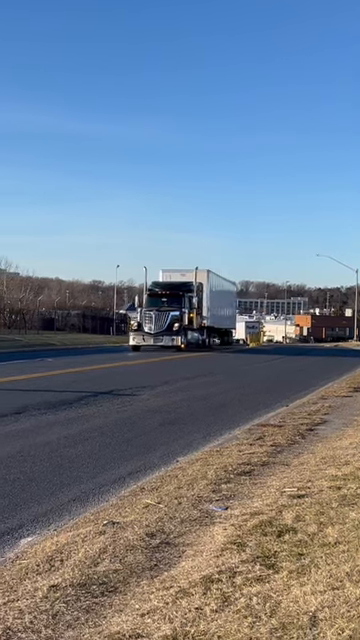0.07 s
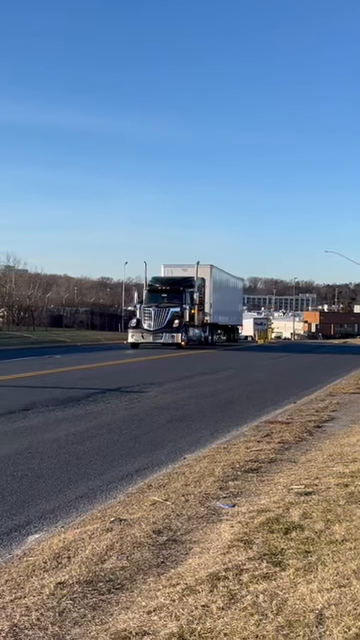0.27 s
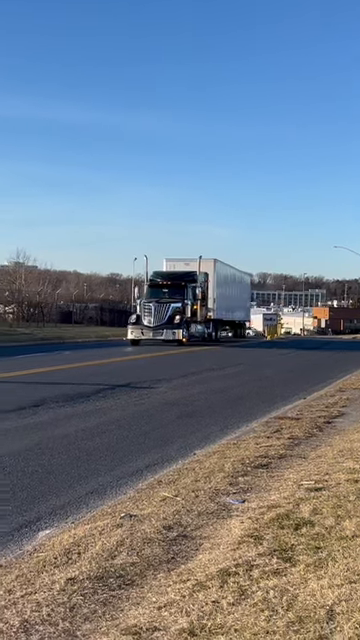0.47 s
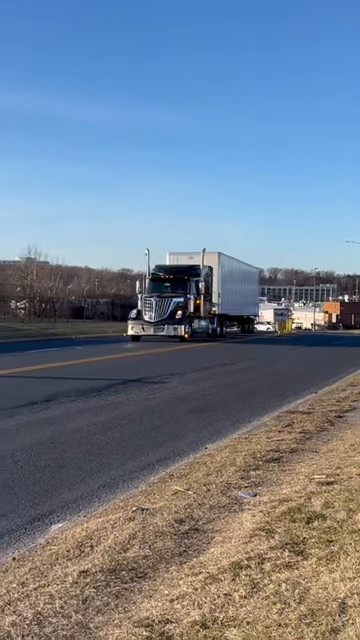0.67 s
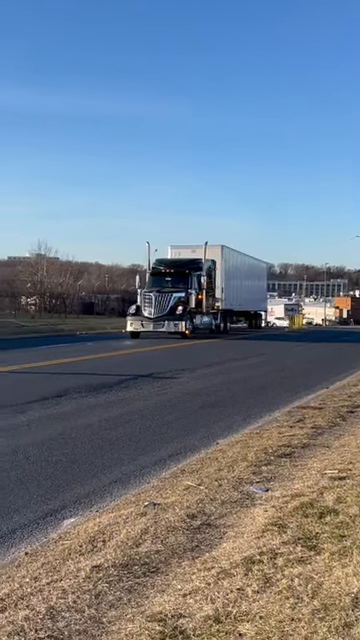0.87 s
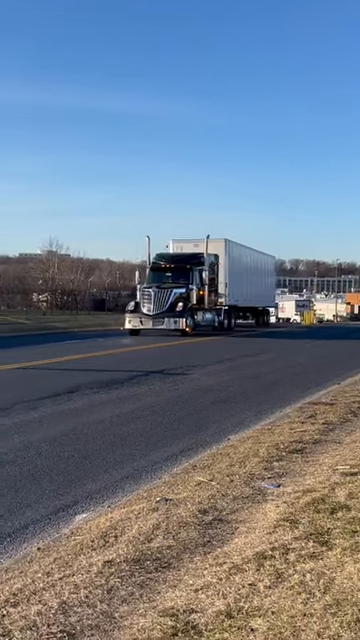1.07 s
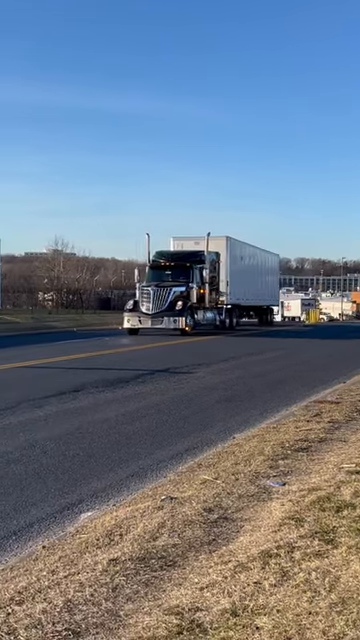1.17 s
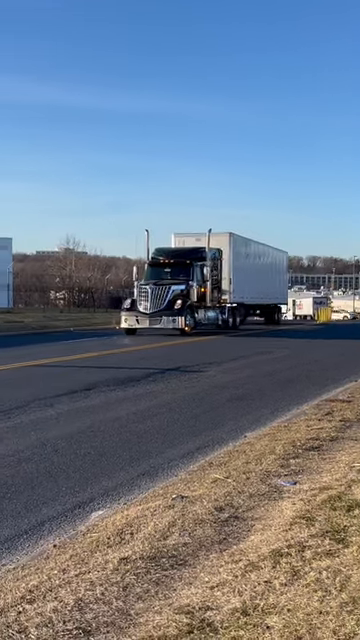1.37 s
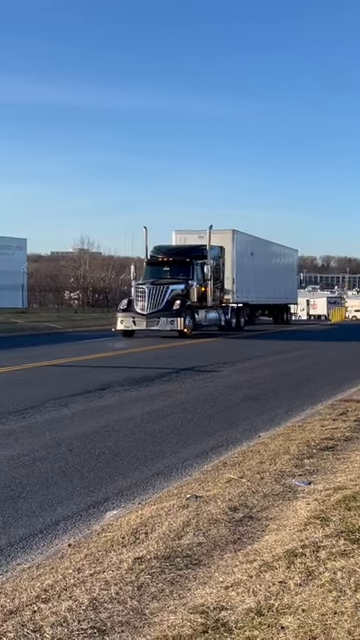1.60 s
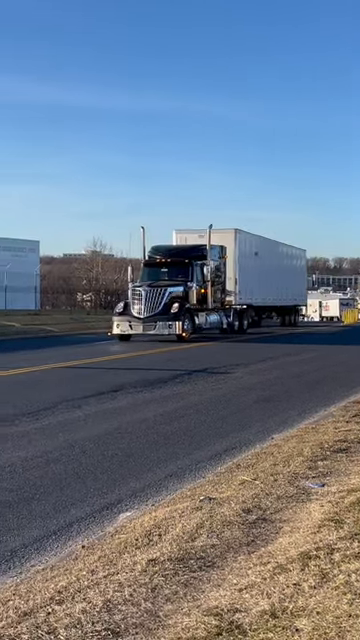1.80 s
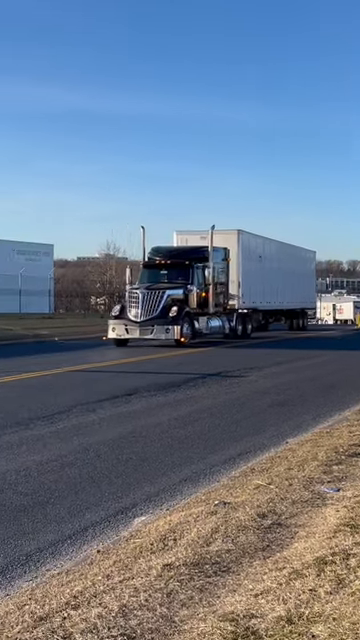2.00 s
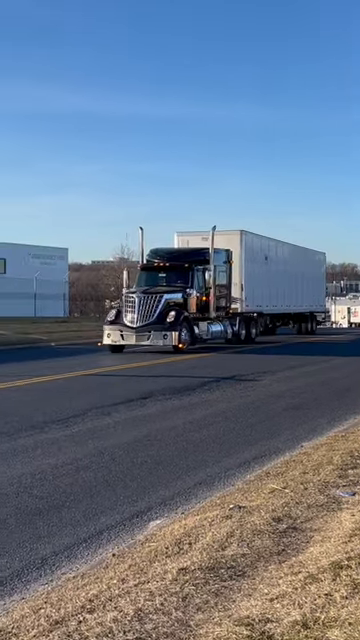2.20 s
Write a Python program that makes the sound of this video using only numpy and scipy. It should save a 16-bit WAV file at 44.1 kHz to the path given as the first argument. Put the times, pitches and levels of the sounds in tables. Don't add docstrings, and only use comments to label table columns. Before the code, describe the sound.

A truck air horn sounds three times at an open roadside. From 0 to 0.9 s, gusts buffet and thump the stereo microphone over tyre roar and low exhaust hum. A brassy, buzzing three-note blast runs about 0.95-1.25 s, a longer one 1.3-1.65 s, a short one 1.72-1.95 s, with hiss and wall echoes. Faint air puffs near 2.0 and 2.2 s close over quieter rumble.

```python
import sys
import numpy as np
from scipy import signal
from scipy.fft import rfft, irfft, next_fast_len
from scipy.io import wavfile
from scipy.ndimage import uniform_filter1d, map_coordinates

SR = 44100
rng = np.random.default_rng(int(sys.argv[2]) if len(sys.argv) > 2 else 0)


def output_pcm(signal):
    pcm = np.clip(np.atleast_2d(signal).T, -1, 1) * 32767
    wavfile.write(sys.argv[1], SR, np.round(pcm).astype(np.int16))


def boost_factor(decibels):
    exponent = np.asarray(decibels, float) / 20
    return 10 ** exponent


N = 99225
T = np.arange(N) / SR
HALVES = np.array([[0.5], [-0.5]])


def unit(x):
    return x / np.sqrt(np.mean(x ** 2) + 1e-20)


def along(points, hz, column=1):
    p = np.array(points, float)
    return np.interp(np.log(hz + 1), np.log(p[:, 0] + 1), p[:, column])


def curve(points):
    return np.interp(T, *np.transpose(points))


def wobble(rate, count=1):
    knots = np.arange(N) * min(rate, 150) / SR
    return np.array([map_coordinates(rng.standard_normal(400), [knots]) for _ in range(count)])


def filtered(x, response):
    m = next_fast_len(N + 8192)
    return irfft(rfft(x, m) * response(np.fft.rfftfreq(m, 1 / SR)), m)[..., :N]


def rush(spectrum, alike):
    def mid_side(hz):
        turn = np.arccos(np.clip(along(alike, hz), -1, 1)) / 2
        return boost_factor(along(spectrum, hz)) * [np.cos(turn), np.sin(turn)]

    mid, side = filtered(rng.standard_normal((2, N)), mid_side)
    return unit(np.array([mid + side, mid - side]))


def patchy(x):
    z = signal.stft(x, nperseg=512)[2]
    field = rng.standard_normal(z.shape[-2:])
    field = uniform_filter1d(uniform_filter1d(field, size=4, axis=0), size=8, axis=1)
    patch_db = 3.5 * (unit(field) - 1.5)
    return signal.istft(z * boost_factor(patch_db), nperseg=512)[1][..., :N]


# (time [s], level [dB])
GUSTS = [(0.0, -34.5), (0.09, -36), (0.45, -32), (0.53, -28.5), (0.64, -35), (0.69, -24), (0.74, -35),
         (0.8, -28), (0.9, -37), (1.19, -48), (1.63, -38.5), (2.25, -37)]
# (time [s], peak level [dB], eddy pitch [Hz])
THUMPS = [(0.325, -22.5, 60), (0.35, -21.5, 90), (0.428, -23.5, 160), (0.444, -19, 110), (0.464, -29, 100),
          (0.488, -23, 90), (0.512, -20.5, 220), (0.544, -23, 140), (0.587, -21.5, 260), (0.601, -26, 90),
          (0.666, -17, 80), (0.683, -14, 240), (0.693, -18, 300), (0.732, -22.5, 110), (0.777, -18.5, 110),
          (0.779, -18.5, 700), (0.79, -25, 200), (0.816, -16, 330), (0.851, -23.5, 100), (0.875, -26, 140)]
# (frequency [Hz], density [dB per Hz])
WIND = [(65, -16.5), (110, 0), (320, -6), (900, -16), (1500, -77.5)]
# (frequency [Hz], left lead [rad])
WIND_LEAD = [(40, 0.74), (340, -1.4)]


def wind():
    lumps = boost_factor(2.2 * (wobble(39.988) + wobble(25.465, count=2)))
    buffet = unit(lumps * rush(WIND, [(40, 0.15), (200, 0.82)]))
    buffet = boost_factor(curve(GUSTS) + 0.5) * buffet * boost_factor([[1], [-1]])
    push, strength = np.zeros((2, N)), np.zeros(N)
    for s, db, hz in THUMPS:
        shape = boost_factor(db) * np.exp(-((T - s) * hz / 0.664) ** 2)
        start = rng.uniform(0, 2 * np.pi)
        push += shape * np.cos(2 * np.pi * hz * (T - s) + start + [[0.8], [-0.8]])
        strength += shape
    rough = rush([(60, -7.5), (150, 1), (400, -6.5), (1500, -16), (3000, -63)], [(200, 0.29)])
    both = buffet + push + 0.367 * strength * rough
    return filtered(both, lambda hz: np.exp(1j * along(WIND_LEAD, hz) * HALVES))


# (frequency [Hz], density [dB per Hz])
ROAD = [(100, -29.5), (200, -10), (430, -17.5), (600, -3.5), (1150, -10.5), (3000, -20.5), (7500, -39),
        (14300, -69)]
# (frequency [Hz], left minus right [dB])
ROAD_PAN = [(300, -5.5), (700, 0), (2300, -6.5), (7000, 5)]
# (frequency [Hz], correlation [-1 to 1])
ALIKE = [(60, 1), (500, 0), (1400, 0.458), (5000, 0), (13800, 0.53)]
# (pitch [Hz], level [dB], width [Hz], flutter [dB], drift [dB per s])
HUMS = [
    (596.1, -34.5, 22, 3, -10),
    (760, -45.5, 32, 7, -7.5),
]
# (time [s], level [dB])
PUFFS = [
    (2.003, -51),
    (2.178, -53),
]


def road():
    roar = rush(ROAD, ALIKE) * boost_factor(-32 + wobble(9.77) - 3.206 * T)
    roar = filtered(roar, lambda hz: boost_factor(along(ROAD_PAN, hz) * HALVES))
    for hz, db, width, flutter_db, drift_db in HUMS:
        level = boost_factor(db + drift_db * T + flutter_db * wobble(width))
        waver = 1.14 * wobble(width) + 0.53 * wobble(width, count=2)
        roar += level * np.sin(2 * np.pi * hz * T + waver)
    for s, db in PUFFS:
        is_open = abs(T - s - 0.012) < 0.012
        roar += boost_factor(db) * is_open * rush([(2500, -40.5), (4400, 2.5), (6500, -24.5)], [(1000, 0.93)])
    return roar


# (time [s], level [dB])
ENGINE = [(0.0, -33), (0.18, -36.5), (0.82, -33.5), (1.26, -44.5), (1.5, -38), (2.25, -45.5)]


def engine():
    sway = 0.5 * wobble(8.5) + 0.45 * wobble(9.1, count=2)
    rumble = rush([(30, -43.5), (62, 15.5), (100, 4), (140, -41.5)], [(80, 0.56)])
    rumble = boost_factor(3) * rumble * boost_factor([[1], [-1]])
    hum = np.sin(2 * np.pi * 45 * T + sway)
    return boost_factor(curve(ENGINE) + 3.5) * (hum + rumble / 2)


# (time [s], pitch [Hz], level [dB])
DRONE = [
    (1.2, 150, -54.5),
    (1.5, 155.8, -43),
    (1.78, 161, -38.5),
    (1.9, 163.7, -50),
    (2.25, 168.3, -49),
]


def drone():
    s, hz, db = np.transpose(DRONE)
    phase = 2 * np.pi * np.cumsum(np.interp(T, s, hz)) / SR + wobble(25)
    level = boost_factor(np.interp(T, s, db) + 4.0 + 1.9 * wobble(20))
    return level * np.sin(phase + 0.6 * wobble(15, count=2) + [[0.6], [-0.6]])


# (delay [s], pitch ratio, level [dB], left minus right [dB], smear [s], flat face weight)
WALLS = [
    (.018, 0.9955, -9, 0, 0.0088, 0.335),
    (.09, 0.9977, -12.5, -1.1, 0.003, 1.265),
    (.33, 0.99, -21, 5.2, 0.079, .5),
]
# (frequency [Hz], gain [dB])
WALL_COLOUR = [(430, -2), (575, -4.5), (815, 4.5), (1050, -4), (2290, -6.5), (2450, 7), (2900, -5.5),
               (14000, 3)]


def walls(x):
    out, t = np.zeros((2, N)), np.arange(SR // 4) / SR
    leaving_db = -3 * (T - 1.3358)
    for delay, ratio, db, pan_db, smear, face in WALLS:
        late = np.interp(1 + (T - 1 - delay) * ratio, T, x)
        blur = rng.standard_normal((2, len(t))) * np.exp(-t / smear)
        blur[:, 0] = face * np.linalg.norm(blur[0])
        blur = blur / np.linalg.norm(blur[0])
        wet = signal.fftconvolve(late[None], blur, axes=1)[:, :N]
        out += boost_factor(db + leaving_db + pan_db * HALVES + 2 * wobble(18, count=2)) * wet
    return filtered(out, lambda hz: boost_factor(along(WALL_COLOUR, hz)))


# (frequency [Hz], density [dB per Hz])
HISS = [(2000, -42), (3000, -10), (4300, -16), (6500, -12), (8200, -25), (14300, -28)]
# (frequency [Hz], density [dB per Hz])
SKIRT = [(350, -28.5), (600, -25), (1000, -23.5), (2400, -5.5), (3500, -26.5), (6000, -92)]
HISS_DB, HISS_GROWS = -36.5, 1.5


def blast_noise(air):
    hiss = rush(HISS, [(3000, 0.47), (8000, 0.092), (12000, 0.99)])
    hiss = patchy(boost_factor(HISS_DB) * air ** HISS_GROWS * hiss)
    skirt = boost_factor(-34) * air ** 0.303 * rush(SKIRT, [(1000, 0.22)])
    return hiss + skirt * boost_factor([[-2], [2]])


def blowing(blasts):
    edge_s, fade_s, settle_s, release_s = 0.012, 0.035, 0.04998, 0.0868
    level, first, rising, falling = np.zeros((4, N))
    for rows in blasts:
        s, db, first_db = np.transpose(rows)
        opening = np.clip((T - s[0]) / edge_s, 0, 1)
        closing = np.clip((s[-1] + fade_s / 2 - T) / fade_s, 0, 1)
        gate = opening * closing
        level += gate * boost_factor(np.interp(T, s, db))
        first += gate * boost_factor(np.interp(T, s, db + first_db) + 3.5)
        rising += (gate > 0) * np.exp(-abs(T - s[0]) / settle_s)
        falling += (gate > 0) * np.clip(1 - (s[-1] - T) / release_s, 0, 1)
    return level, first, rising, falling


# (pitch [Hz], overshoot [share], sag [share])
TRUMPETS = [
    (435.05, 0.01273, 0.0044),
    (573.42, 0.007768, 0.00147),
    (822.6, 0.002934, 0.0069),
]
# (time [s], level [dB], first partial against that level [dB])
LOW = [
    [(0.98, -41, -3.5), (1.048, -23.5, -5), (1.174, -27, -6.5), (1.25, -40.5, 4.5)],
    [(1.34, -31.5, -9.5), (1.4, -24, -20.5), (1.548, -23.5, -22), (1.62, -34, 1.5), (1.72, -51.5, 11.5)],
    [(1.75, -33.5, 4.5), (1.822, -22.5, -8), (1.88, -23.5, -0.5), (1.95, -48, 7.5)],
]
MIDDLE = [
    [(0.95, -51.5, 5.7), (0.976, -34.5, 14.03), (1.054, -26, 1.9), (1.176, -32, 6.7), (1.22, -48.5, 6.1)],
    [(1.3, -46, 17.5), (1.338, -29, 5), (1.392, -22.5, -3), (1.585, -21, -3), (1.615, -31.5, 0),
     (1.66, -37, 6.5)],
    [(1.71, -42.5, 9.5), (1.742, -30.5, 9.7), (1.774, -24, 5.7), (1.86, -24.5, 3.64), (1.9, -38, 12.2),
     (1.95, -52, 21.2)],
]
HIGH = [
    [(0.935, -45.5, 18), (0.979, -24.5, 9.44), (1.03, -23, 2.4), (1.135, -23, 1.7), (1.21, -30.5, 8)],
    [(1.285, -32.5, 11), (1.33, -29, 4.5), (1.49, -22, -0.5), (1.63, -29.5, 9)],
    [(1.72, -29.5, 3.7), (1.754, -25.5, 2.8), (1.8, -26.5, 6.36), (1.87, -27.5, 9.6), (1.92, -42, 15)],
]
# (level [dB], ..)
PARTIALS = [
    (-7.5, 2.5, -10.5, -12.5, -15, -26, -21),
    (5, 1.5, 0.5, -6.5, -17, -21.5, -29),
    (4, -5.5, -19, -22.5, -28, -49.5, -35),
]
# (first blast [dB], second [dB], third [dB])
UPPER = [
    (1.5, 0.038, -1.81),
    (7.5, -1.3, -2.5),
    (3.33, -0.46, -4.5),
]
MIXED = [(2, 1, 0), (1, 2, 0), (3, -3, 2), (3, 1, 0), (2, 2, 0), (0, 2, 1), (1, 0, 2), (0, 1, 2), (1, 2, 1),
         (0, 3, 1), (5, 1, 0), (0, 4, 1), (3, 4, 0), (0, 4, 2), (0, 3, 3), (0, 5, 2)]
MIXED_DB = [-35, -35, -36.5, -48, -52, -54.5, -51.5, -43, -52, -50.5, -55, -48, -57.5, -51, -45.5, -52]
SQUEAL_DB = (-30, -30, 2)
FULL_DB, BRIGHTEN = -24.5, 0.49
SHIMMER_DB, WAVER = 1.6876, 0.388


def horn():
    out, phases, airs = np.zeros(N), [], []
    trumpets = zip((LOW, MIDDLE, HIGH), TRUMPETS, PARTIALS, UPPER, SQUEAL_DB)
    for blasts, (hz, over, sag), partials, upper, squeal_db in trumpets:
        later_starts = [rows[0][0] for rows in blasts[1:]]
        upper_db = np.array(upper)[np.searchsorted(later_starts, T)]
        level, first, rising, falling = blowing(blasts)
        air = level / boost_factor(FULL_DB)
        pitch = hz * (1 + over * rising - sag * falling)
        phase = 2 * np.pi * np.cumsum(pitch) / SR + WAVER * wobble(30.144)[0] / 2
        squeal = boost_factor(squeal_db) * level * rising * (T < later_starts[0])
        out += first * np.sin(phase) + squeal * np.sin(4 * phase)
        levels = list(partials) + [partials[-1] - 6 * j for j in range(1, 15)]
        for k, db in enumerate(levels[:int(9500 / hz)], 2):
            shimmer_db = SHIMMER_DB * (0.9371 + 0.904 * min(max(k - 5, 0), 4)) * wobble(22.054)[0]
            size = level * air ** (BRIGHTEN * max(k - 3, 0))
            size = size * boost_factor(db + upper_db * (k > 2) + shimmer_db)
            out += size * np.sin(k * phase + rng.uniform(0, 6.79) + WAVER * wobble(20)[0])
        phases.append(phase)
        airs.append(air)

    phases = np.array(phases)
    for multiples, db in zip(MIXED, MIXED_DB):
        size = np.sqrt(airs[0] * airs[1]) * boost_factor(db + 2.99 * SHIMMER_DB * wobble(14)[0])
        out += size * np.sin(np.array(multiples) @ phases + WAVER * wobble(25)[0])

    air = np.mean(airs, 0)
    slaps = np.exp(5.1 * (np.cos(phases) - 1))
    meeting = slaps[0] * slaps[1] + slaps[1] * slaps[2] + slaps[0] * slaps[2]
    rasp = unit(filtered(meeting, lambda hz: boost_factor(along(HISS, hz) + 2 * np.log2(hz + 1))))
    rasp = patchy(boost_factor(HISS_DB + 1.5) * air ** HISS_GROWS * rasp)
    pulsing_air = air * (1 + 0.5 * unit(slaps[1] - slaps[1].mean()) / 2)
    return out - 0.046 * out ** 3 + rasp, pulsing_air


# (frequency [Hz], left minus right [dB], left lead [rad])
PORTS = [(431, 1, -1.14), (635.7, -6.5, 2), (896, 0, 0.7642), (1130, -3, -1.5), (1730, -6.5, 1.1277),
         (2180, -11, -0.5), (2910, -10, 4), (3500, -2, 4.5)]


def at_ports(tone):
    def response(hz):
        lead = along(PORTS, hz, column=2)
        return boost_factor(along(PORTS, hz) * HALVES) * np.exp(1j * lead * HALVES)

    return filtered(tone, response)


def duck():
    return boost_factor(-0.5 * np.clip((T - 1) / 0.056, 0, 1))


def scene():
    tone, air = horn()
    noise = blast_noise(air)
    horn_heard = at_ports(tone) + noise + walls(tone + noise[1])
    return (horn_heard + wind() + engine() + drone()) / duck() + road()


def band_limit(x):
    return signal.sosfilt(signal.butter(12, 14430, fs=SR, output="sos"), x)


def record(dry):
    x = dry * duck()
    x = x / (1 + abs(x / 0.95) ** 8) ** (1 / 8)

    def band(hz):
        treble = boost_factor(-14 * np.clip((hz - 13600) / 700, 0, 3))
        return treble * np.clip(hz / 40, 0, 1) ** 5

    return band_limit(filtered(x, band))


dry = scene()
out = record(dry)
output_pcm(out)
```